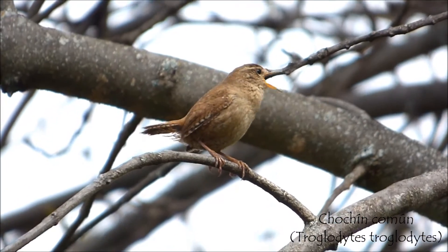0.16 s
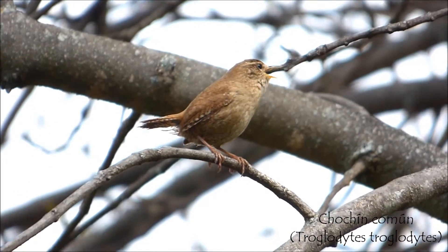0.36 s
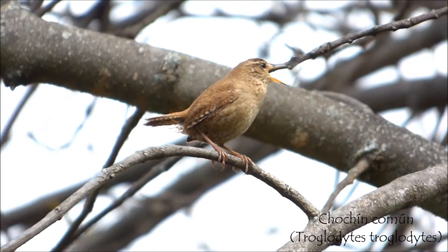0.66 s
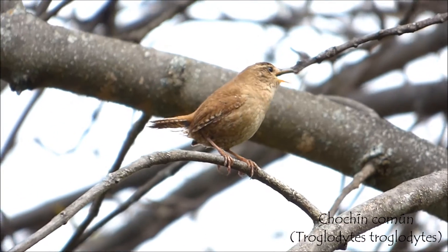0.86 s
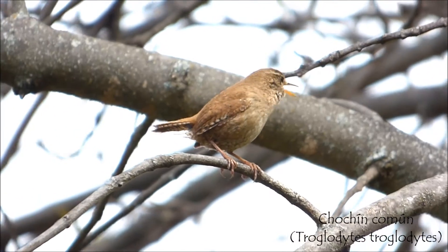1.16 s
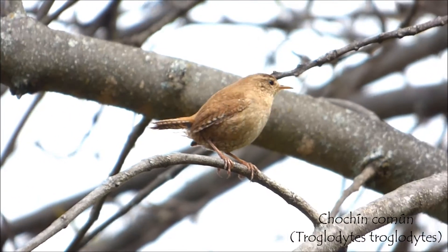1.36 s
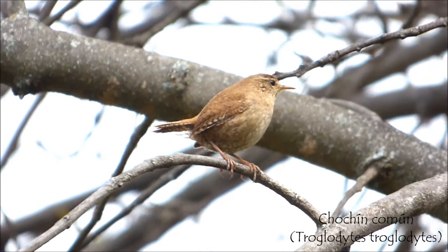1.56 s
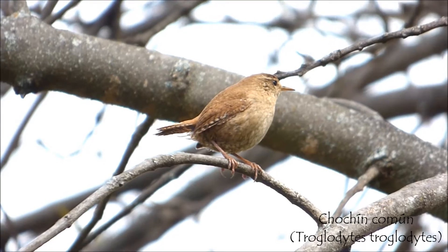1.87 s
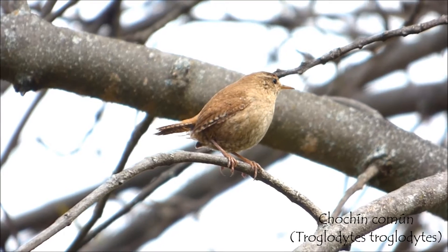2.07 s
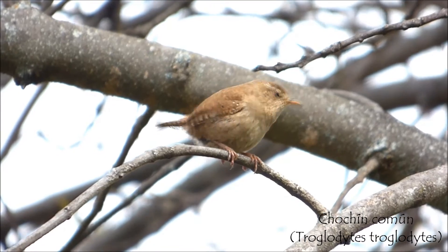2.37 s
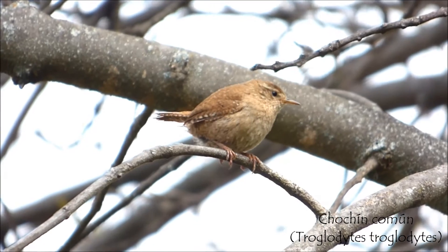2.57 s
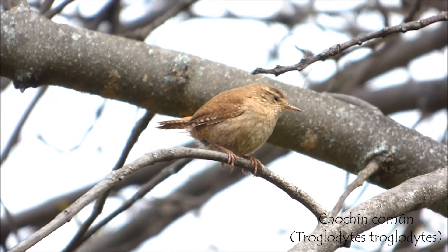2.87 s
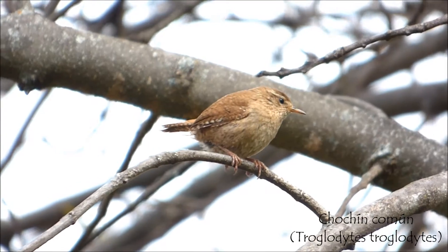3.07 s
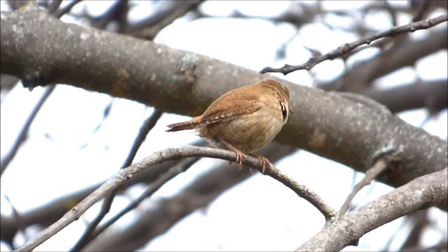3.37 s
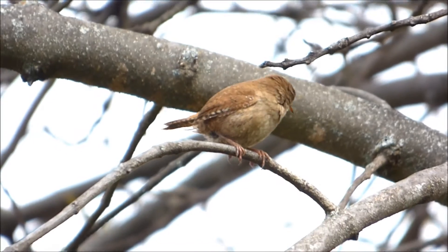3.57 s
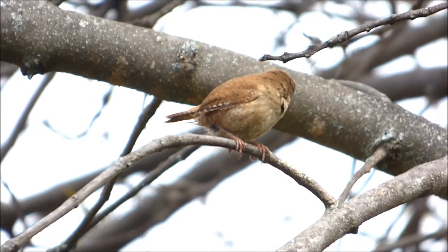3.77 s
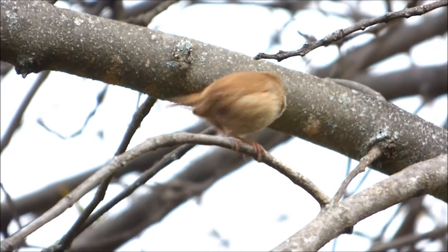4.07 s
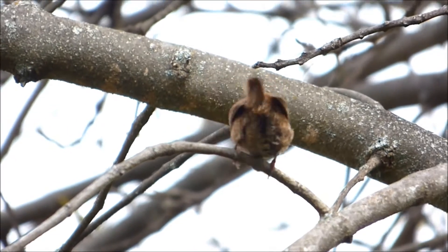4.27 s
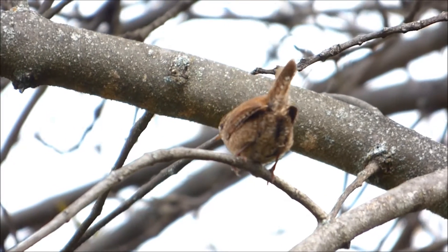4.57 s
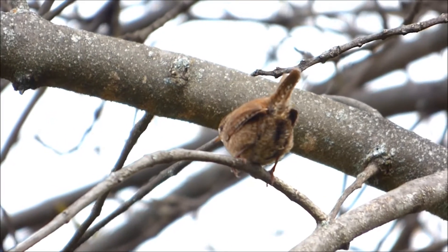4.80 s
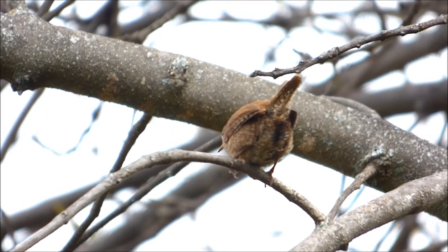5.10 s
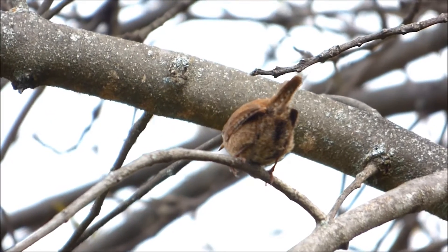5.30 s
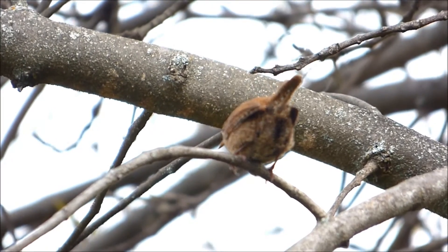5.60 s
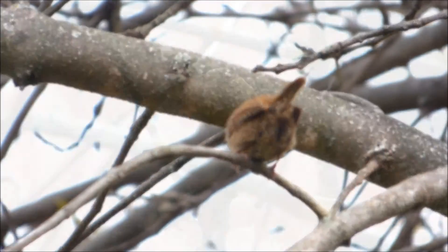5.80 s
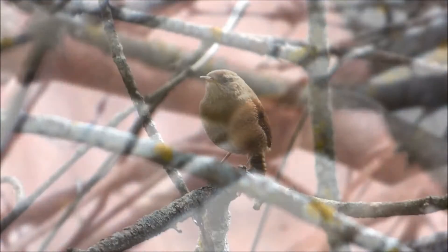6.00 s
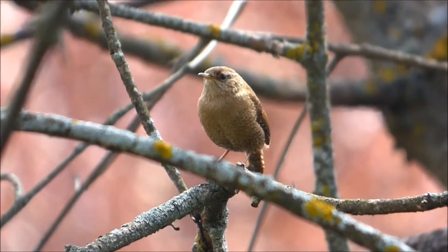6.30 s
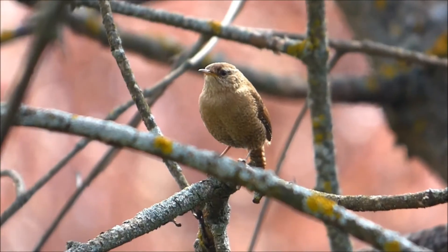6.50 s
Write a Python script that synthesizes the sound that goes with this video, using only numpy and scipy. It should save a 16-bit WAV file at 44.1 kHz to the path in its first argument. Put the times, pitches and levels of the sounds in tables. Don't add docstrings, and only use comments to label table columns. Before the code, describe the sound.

Loud, high trill and eight sharp falling whistles from a nearby wren, then a fainter chorus of warbling, twittering birds in a quiet wood.

```python
import sys
import numpy as np
from scipy import signal
from scipy.io import wavfile
from scipy.ndimage import uniform_filter1d

SR = 44100
rng = np.random.default_rng(int(sys.argv[2]) if len(sys.argv) > 2 else 0)


def bounce(signal):
    frames = np.transpose(np.atleast_2d(signal))
    limited = np.clip(frames, -1, 1)
    pcm = np.round(limited * 32767).astype(np.int16)
    wavfile.write(sys.argv[1], SR, pcm)


def level_to_linear(level):
    exponent = np.asarray(level, float) / 20
    return 10 ** exponent


N = 293265
STROKE_S = .0055

# t/s from its start, f/Hz, level/dB
HOOK = [(0, 5830, -37), (.007, 7050, -41), (.044, 6790, -35.5), (.074, 6200, -36.5), (.101, 5180, -37)]
VEE = [(0, 6380, -48), (.015, 5280, -36), (.04, 4420, -39.5), (.053, 4880, -44), (.062, 7130, -45.5),
       (.085, 6400, -46)]
RISE = [(0, 4000, -39), (.005, 4480, -35), (.014, 4900, -33), (.028, 5660, -40.5)]
DROOP = [(-.007, 5340, -62), (0, 7540, -40.5), (.008, 7690, -39.5), (.02, 7310, -56), (.03, 7400, -35.5),
         (.055, 6920, -37), (.077, 6100, -31.5)]


def evened(x):
    return x / np.sqrt(np.mean(x ** 2) + 1e-20)


def read(points, hz):
    f, value = np.transpose(points)
    return np.interp(np.log(hz + 1), np.log(f + 1), value)


def drift(size, span):
    return evened(np.convolve(rng.standard_normal(size + span - 1), np.hanning(span), "valid"))


def add(mix, s, sound, pan_db):
    left = 1 / (1 + level_to_linear(-2 * pan_db))
    part = mix[:, max(round(s * SR), 0):][:, :len(sound)]
    part += np.sqrt([[2 * left], [2 - 2 * left]]) * sound[:part.shape[1]]


def resonate(x, hz, width):
    return signal.lfilter(*signal.iirpeak(hz, hz / width, SR), x)


def syrinx(hz, overtone_db):
    breath = evened(1.1 + drift(len(hz), span=50))
    wavering_hz = hz * (1 + .004 * drift(len(hz), span=110))
    phase = 2 * np.pi * (np.cumsum(wavering_hz) / SR + rng.random())
    return np.sin(phase) + level_to_linear(overtone_db) * breath * np.sin(2 * phase)


def whistle(rows, overtone_db=-38, purity=0.23):
    s, hz, db = np.transpose(rows)
    t = np.arange(s[0], s[-1], 1 / SR)
    hz = uniform_filter1d(np.interp(t, s, hz), 130, mode="nearest")
    db = np.interp(t, s, db)
    ends = np.clip(np.minimum(t - s[0], s[-1] - t) / .003, 0, 1)
    far = np.clip((-44 - db.max()) / 10, 0, 1)
    flutter_db = (1.1 + 3.5 * far) * drift(len(t), span=350)
    hz = hz * (1 + .016 * far * drift(len(t), span=300))
    voice = syrinx(hz, overtone_db - purity * (db - db.mean()))
    return level_to_linear(db + flutter_db) * voice * np.sin(np.pi / 2 * ends)


def chip(mix, s, length, start_hz, end_hz, db, pan_db, overtone_db=-22):
    u = np.linspace(-.65, .65, round(1.3 * length * SR))
    hz = (start_hz + end_hz) / 2 + u * (end_hz - start_hz)
    swell = np.hanning(len(u)) * level_to_linear(db + 2.5 + 1.5 * u)
    add(mix, s - len(u) / SR / 2, swell * syrinx(hz, overtone_db), pan_db)


def glide(start, length, start_hz, end_hz, db, shape):
    glide_shapes = {"even": (1.01, 1, 0.87), "early": (0.36, 4.4, 8.6), "late": (3.2, 5.7, 0.98)}
    power, swell_db, dip_db = glide_shapes[shape]
    u = np.linspace(0, 1, num=12)
    hz = start_hz + (end_hz - start_hz) * u ** power
    level_db = db + swell_db * (u - .5) - dip_db * (2 * u - 1) ** 2
    return np.transpose([start + u * length, hz, level_db])


def hum():
    # f/Hz, density level/dB
    wash_curve = [(25, -19), (110, -22), (200, -10), (560, -16.5), (750, -5), (1200, -12.5), (2500, -25),
                  (4500, -22.5), (7000, -28), (10000, -31), (13500, -41), (15200, -38)]
    # f/Hz, width/Hz, level/dB
    drone_peaks = [(421.5, 95, -58), (642, 60, -59), (890, 28, -58), (1032, 245, -57.5), (1399, 11.3, -63)]
    # f/Hz, phase/rad
    port_lead = [(470, -.3), (620, -2.9), (1400, -3.1), (2000, -6.1), (8000, -6.3)]
    # f/Hz, likeness 0-1
    port_likeness = [(60, .8), (400, .9), (1000, .62), (14000, .2)]
    # f/Hz, left minus right level/dB
    port_balance = [(180, -1.5), (380, 4), (700, 0), (8000, -3), (14000, 0)]
    frames, hz = N // 256 + 5, np.fft.rfftfreq(1024, 1 / SR)
    a, b, c, d, patches = rng.standard_normal((frames, 513, 5)).T
    patches = evened(uniform_filter1d(uniform_filter1d(patches, 8, 0), 12, 1))
    wash = level_to_linear(read(wash_curve, hz))
    power = (level_to_linear(-53) * wash) ** 2 / np.sum(wash ** 2)
    for f, width, db in drone_peaks:
        bell = np.exp(-(2 * (hz - f) / width) ** 2)
        power = power + level_to_linear(2 * db) * bell / bell.sum()
    same = np.clip(read(port_likeness, hz), 0, 1)[:, None]
    left = a + 1j * b
    right = same * left + np.sqrt(1 - same ** 2) * (c + 1j * d)
    right = right * np.exp(-1j * read(port_lead, hz))[:, None]
    lean = level_to_linear(read(port_balance, hz) / 2)[:, None]
    z = np.array([left * lean, right / lean]) * np.sqrt(power)[:, None] * level_to_linear(1.61 * patches)
    noise = signal.istft(z, nperseg=1024, noverlap=768)[1][:, :N]
    return np.sqrt(power.sum()) * evened(noise)


def wood(x, wet_db, near=0.42):
    # t/s, level/dB
    trunk_echoes = [(.0021, -17.5), (.0045, -13.5), (.0075, -19.5), (.033, -35.5), (.035, -13),
                    (.039, -21.5), (.052, -27)]
    # f/Hz, t60/s
    decay_times = [(2500, 0.87), (8000, 0.47), (14000, 0.36)]
    taps = np.zeros((2, 30000))
    at = np.arange(100, 30000, 20) + rng.integers(0, 20, (2, 1495))
    np.put_along_axis(taps, at, rng.choice([-1., 1.], at.shape), 1)
    taps *= level_to_linear(2.1 * drift(taps.shape[1], span=900))
    s = np.arange(taps.shape[1]) / SR
    taps *= 1 + near * np.exp(-(s / 0.038) ** 2)
    taps[1] = 0.63 * taps[0] + 0.76 * taps[1]
    hz, t, z = signal.stft(taps, SR, nperseg=256)
    decay = level_to_linear(-60 * t / read(decay_times, hz)[:, None])
    tail = signal.istft(z * decay, SR, nperseg=256)[1]
    tail *= level_to_linear(wet_db) / np.linalg.norm(tail, axis=1)[:, None]
    for delay, db in trunk_echoes:
        tail[:, round(delay * SR)] += level_to_linear(db) * min(near + 0.22, 1)
    spread = 0.6 * x + 0.43 * x[::-1]
    return x + signal.oaconvolve(spread, tail, axes=1)[:, :N]


def ports(x):
    high_pass = signal.butter(4, 10500, "high", fs=SR, output="sos")
    treble = signal.sosfiltfilt(high_pass, x[1])
    return x - [[.35], [0]] * treble


def distant_reel():
    u = np.linspace(0, 1, round(.46 * SR))
    hiss = resonate(resonate(rng.standard_normal(len(u)), 6550, 500), 6600, 700)
    mix = np.zeros((2, N))
    add(mix, 1.8, level_to_linear(-70.5 + 5.3 * u) * evened(hiss) * signal.windows.tukey(len(u), .2), -4)
    return mix


def far_bird():
    # t/s from its start, f/Hz, level/dB
    falling_note = [(0, 7380, -69), (.025, 6640, -51), (.04, 5600, -53), (.057, 4280, -55)]
    fall_times = [
        5.98,
        6.098,
        6.235,
        6.375,
        6.52,
    ]
    mix = np.zeros((2, N))
    for at in fall_times:
        add(mix, at, whistle(falling_note), 15)
    return mix


def chatter():
    # t/s, length/s, level/dB
    rasps = [
        (3.064, 0.05, -48),
        (3.169, 0.035, -45.5),
        (3.255, 0.055, -46.5),
        (3.355, 0.062, -47),
        (3.484, 0.048, -46.5),
        (3.604, 0.052, -46.5),
        (3.74, 0.066, -48.5),
        (3.885, 0.034, -46),
        (3.994, 0.07, -49),
        (4.107, 0.017, -60),
    ]
    # f/Hz, width/Hz, level/dB
    throat = [(2450, 750, 10), (3000, 700, 7), (1750, 700, 1.5), (9500, 4100, -12)]
    mix = np.zeros((2, N))
    for at, length, db in rasps:
        n = round(length * SR)
        turns = np.cumsum(330 * (1 + 0.42 * drift(n, span=150))) / SR
        drive = (0.18 + np.exp(-(turns % 1) / 0.25)) * rng.standard_normal(n)
        gape = rng.normal(1, .06)
        rasp = np.zeros(n)
        for f, width, gain_db in throat:
            rasp += level_to_linear(gain_db) * resonate(resonate(drive, gape * f, width), gape * f, width)
        add(mix, at, level_to_linear(db) * evened(rasp) * signal.windows.tukey(n, .6), -12)
    return mix


def gabble():
    mix = np.zeros((2, N))
    for when, high, span, loud in rng.random((160, 4)):
        hz = 5600 + 3200 * high
        half_hz = 2400 * (span - .5)
        chip(mix, 2.85 + when, STROKE_S, hz - half_hz, hz + half_hz, -52 + 8 * loud, -44.0, overtone_db=-20.0)
    return mix


def buzzes(mix):
    buzz_rows = [
        (4.95, 4.985, 3500, 3570, 140, -59),
        (5.11, 5.209, 3490, 4040, 130, -53),
        (5.28, 5.375, 3510, 3820, 120, -54.5),
    ]
    for start, end, start_hz, end_hz, rate, db in buzz_rows:
        length = end - start
        u = np.linspace(0, 1, round(length * SR))
        throb = np.maximum(np.cos(2 * np.pi * rate * (1 - u) * length - 3.6), 0) ** 1.2
        voice = syrinx(start_hz + u * (end_hz - start_hz), -40)
        add(mix, start, level_to_linear(db + 6.6 + 4.4 * u) * throb * voice, 5)


def far_trills(mix):
    trill_rows = [
        (4.4195, 4.74, 38.2, -49, 7),
    ]
    for first, last, rate, db, pan_db in trill_rows:
        for at in np.arange(first, last, 1 / rate):
            chip(mix, at, STROKE_S, 6900, 4480, db, pan_db)


def twitter(mix):
    # centre t/s, f/Hz at start and end, level/dB
    quick_strokes = [(2.5855, 6900, 9600, -48), (3.079, 5170, 7350, -37), (3.083, 5170, 7500, -36),
                     (3.089, 5660, 7760, -32), (3.312, 8100, 5000, -42), (3.163, 4900, 7340, -36),
                     (3.238, 6550, 8900, -33), (3.327, 4730, 7560, -42), (3.332, 5340, 7900, -39),
                     (3.337, 5050, 7400, -40), (3.513, 8300, 5750, -28.5), (3.534, 7050, 6450, -35),
                     (3.543, 7140, 9060, -39), (3.55, 7570, 7160, -29), (3.56, 7800, 8240, -46),
                     (3.565, 4970, 6140, -34), (3.569, 7730, 7200, -29), (3.632, 6500, 8860, -29),
                     (3.646, 6270, 8000, -28.5), (3.654, 9600, 6850, -29), (3.663, 8760, 9300, -38),
                     (3.688, 8240, 4120, -42), (3.706, 8830, 4770, -34), (3.752, 6150, 7700, -32),
                     (3.766, 5400, 9100, -42), (3.911, 8230, 7240, -39), (3.919, 8040, 7000, -37),
                     (3.927, 7100, 7900, -35)]
    # centre t/s, f/Hz at start and end, level/dB
    slow_strokes = [(2.579, 6200, 6800, -51), (2.609, 7300, 9000, -56), (2.61, 6750, 7650, -46),
                    (3.071, 5440, 7450, -41), (3.095, 8450, 5760, -32), (3.109, 8440, 4900, -29.5),
                    (3.203, 6000, 7500, -44), (3.212, 7500, 9300, -40), (3.472, 4770, 5200, -42),
                    (3.493, 5700, 4860, -42), (3.728, 4860, 5640, -38), (3.751, 4850, 6100, -39)]
    # delay t/s, length/s, f/Hz at start and end, relative level/dB
    stroke_figures = [
        [(-.004, .005, 7000, 4830, -5.5), (0, 0.007, 7600, 4700, 0), (.015, 0.006, 7200, 9500, -10),
         (.02, 0.0075, 7240, 7660, -5)],
        [(-.004, 0.0071, 7700, 6100, -1), (.003, 0.012, 6400, 5100, 3.5), (-0.0064, 0.0056, 9000, 6600, -1)],
    ]
    # t/s of first and last, gap/s, first and last level/dB
    figure_repeats = [
        (2.6295, 2.842, .035, -40, -34),
        (2.899, 3.013, .0164, -45.5, -39.5),
    ]
    for length, strokes in [(.0034, quick_strokes), (.0099, slow_strokes)]:
        for at, *stroke in strokes:
            chip(mix, at, length, *stroke, -26.0)
    for figure, (first, last, gap, first_db, last_db) in zip(stroke_figures, figure_repeats):
        for at in np.arange(first, last, gap):
            db = np.interp(at, [first, last], [first_db, last_db]) + rng.normal(0, 1.5)
            for delay, *sweep, relative_db in figure:
                stroke_s = at + delay + rng.normal(0, 0.00073)
                chip(mix, stroke_s, *sweep, db + relative_db + rng.normal(0, 2.5), -24.0)


def whistlers():
    # t/s, f/Hz, level/dB
    wren_notes = [
        [(0.305, 6900, -30), (0.311, 7900, -32), (0.32, 8000, -24.5), (0.335, 7650, -23), (0.343, 7210, -24.5),
         (0.356, 7240, -27)],
        [(0.397, 3740, -47), (0.415, 3975, -38), (0.431, 4180, -27.5), (0.436, 5020, -39), (0.441, 4400, -38)],
    ]
    right_warbles = { (-6.5, -36): [[(1.39, 3330, -58), (1.42, 3380, -55), (1.45, 3510, -47),
                     (1.51, 3510, -57.5), (1.56, 3470, -66)], [(1.972, 6250, -55), (1.99, 5620, -51),
                     (2.025, 5690, -41), (2.03, 5650, -46), (2.038, 4700, -55)], [(2.613, 4100, -42.5),
                     (2.645, 4137, -33.5), (2.658, 4260, -57), (2.685, 4260, -43.5), (2.715, 4380, -55)],
                     [(2.197, 4200, -55), (2.208, 5170, -41), (2.222, 4300, -43), (2.255, 3890, -42.5),
                     (2.3, 3790, -44.5), (2.32, 3560, -40.5), (2.345, 2940, -49), (2.375, 2570, -56.5),
                     (2.44, 2560, -64)], [(2.44, 2650, -58), (2.46, 2900, -53), (2.485, 3060, -41),
                     (2.51, 3100, -48), (2.53, 3560, -41.5), (2.556, 3640, -42)], [(2.86, 1843, -66),
                     (2.9, 2000, -62), (2.92, 2210, -54), (2.945, 2380, -51), (2.985, 2415, -48.5)]],
                     (-21, -19): [[(3.35, 5460, -50), (3.375, 5650, -37), (3.39, 6520, -32),
                     (3.41, 7200, -29), (3.45, 7240, -38)], [(3.36, 6600, -51), (3.378, 6700, -38),
                     (3.395, 6970, -36), (3.413, 7420, -33)]]}
    left_warbles = { (7, -44): [[(5.457, 8200, -49), (5.468, 7530, -46), (5.482, 7650, -42),
                    (5.497, 7970, -37), (5.52, 7790, -36), (5.546, 7807, -45), (5.6, 7700, -43)],
                    [(3.576, 6210, -46), (3.6, 6350, -35.5), (3.63, 6200, -38.5), (3.648, 5950, -36.5),
                    (3.675, 4950, -36.5)], [(4.78, 6600, -44), (4.795, 7400, -45), (4.82, 8090, -39),
                    (4.86, 7370, -38), (4.9, 5270, -35)]], (6.4, -21): [[(4.765, 6200, -51),
                    (4.78, 5650, -47), (4.79, 5850, -41), (4.803, 5600, -42), (4.812, 5930, -44),
                    (4.835, 6240, -43)], [(5.808, 6350, -40.5), (5.835, 5550, -34.5), (5.86, 5730, -38),
                    (5.885, 5040, -36), (5.945, 4560, -37.5)]], (3.5, -36): [[(4.94, 4420, -57),
                    (4.962, 4380, -47), (4.973, 3970, -38)], [(4.979, 4770, -43), (4.99, 4070, -35),
                    (5.0, 3560, -41.5), (5.012, 3480, -39), (5.021, 2400, -55)], [(5.32, 2760, -69),
                    (5.34, 3050, -41), (5.357, 2933, -47), (5.366, 2984, -39), (5.375, 2964, -50),
                    (5.393, 3020, -42), (5.405, 3176, -40), (5.446, 3145, -44.5)], [(5.488, 3700, -51),
                    (5.496, 4070, -38), (5.52, 3740, -38), (5.537, 3410, -42)], [(5.58, 3230, -46),
                    (5.605, 3350, -46), (5.625, 3810, -34.5), (5.65, 4040, -34.5), (5.662, 3700, -42),
                    (5.68, 3060, -49), (5.7, 3040, -45)], [(6.025, 2450, -51), (6.035, 4280, -44),
                    (6.05, 3884, -38), (6.066, 4150, -33), (6.078, 3900, -32.5), (6.084, 4080, -32),
                    (6.092, 3900, -38), (6.105, 4120, -32.5), (6.135, 4184, -38.5)], [(6.185, 4025, -46),
                    (6.2, 4090, -33), (6.22, 3340, -42), (6.27, 2900, -41)]]}
    left_bird = {"even": [(5.638, 0.022, 5570, 4160, -33.5), (5.712, 0.042, 5250, 5060, -33.5),
                 (5.862, .014, 4230, 3260, -54), (5.876, 0.022, 3220, 3150, -58),
                 (6.012, 0.012, 2700, 3560, -53)]}
    middle_bird = {"even": [(1.405, 0.033, 4510, 4690, -39.5), (4.015, 0.018, 3900, 4580, -46),
                   (4.712, 0.023, 3800, 4170, -46.5), (4.733, 0.0067, 4200, 4940, -43),
                   (5.021, 0.0079, 2890, 3120, -42.5), (5.08, 0.027, 2410, 2760, -59),
                   (6.35, 0.03, 3080, 2520, -47), (6.315, 0.061, 2890, 3680, -55)],
                   "early": [(4.228, 0.048, 3660, 3700, -43)], "late": [(3.27, .073, 5300, 4660, -45),
                   (4.605, 0.03, 4660, 5500, -42.5)]}
    right_bird = {"even": [(1.19, 0.066, 3300, 2540, -57), (1.575, 0.011, 6100, 6500, -56),
                  (1.588, .009, 6400, 4250, -54.5), (1.599, .01, 5700, 4250, -45),
                  (1.608, 0.011, 5000, 4720, -44), (1.621, 0.023, 4900, 5350, -42),
                  (1.79, 0.011, 3630, 7150, -55), (1.802, .007, 7100, 4100, -50),
                  (1.838, 0.041, 3240, 2980, -52), (1.884, .03, 2750, 3100, -55.5),
                  (1.976, .025, 4580, 3880, -59), (3.031, 0.045, 3690, 2820, -44),
                  (3.481, 0.067, 3485, 3468, -40.5), (3.655, 0.046, 3035, 2985, -40.5)],
                  "early": [(1.808, 0.031, 4240, 3300, -67), (3.401, 0.066, 4610, 3870, -35.5)],
                  "late": [(3.771, .05, 3790, 2940, -45)]}
    far_right_bird = {"even": [(3.17, 0.017, 4500, 5340, -42.5), (3.245, 0.014, 5330, 5570, -32.5),
                      (3.337, 0.012, 7980, 7600, -33.5), (3.88, 0.011, 5840, 6150, -41)],
                      "early": [(3.215, 0.022, 7350, 7400, -29.5)],
                      "late": [(3.022, 0.028, 7700, 7260, -34.5), (3.882, 0.013, 8850, 8650, -51),
                      (3.895, .016, 8250, 7800, -50)]}
    # t/s, pitch factor, effort level/dB
    song = [
        (HOOK, [(3.716, 0.96, -0.2), (3.857, 0.97, -0.3)]),
        (VEE, [(4.085, 1.01, 4), (4.325, 0.99, 3.5)]),
        (RISE, [(5.037, 1.04, 1), (5.214, 0.98, 1.3), (5.381, 0.99, 1)]),
        (DROOP, [(5.798, 0.98, -2), (5.916, 0.99, -1), (6.04, 1, -0.5), (6.163, 1.03, -2.5), (6.289, 1.02, -1.5)]),
    ]
    # t/s, length/s, f/Hz at both ends, f/Hz in the middle, level/dB
    arches = [
        (3.167, 0.1, 2440, 2970, -46.5),
        (3.822, 0.12, 2840, 2593, -49),
    ]
    left_db, right_db = 7, -6.5
    birds = [(left_bird, left_db), (middle_bird, 4.5), (right_bird, right_db), (far_right_bird, -24)]

    notes = [(rows, 1.5) for rows in wren_notes]
    for bird, pan_db in birds:
        for shape in bird:
            notes += [(glide(*row, shape), pan_db) for row in bird[shape]]
    for shape, repeats in song:
        for at, factor, db in repeats:
            notes.append((np.array(shape) * [1, factor, 1] + [at, 0, db], left_db))
    u = np.linspace(0, 1, num=12)
    arch = 1 - (2 * u - 1) ** 2
    for start, length, ends_hz, middle_hz, db in arches:
        hz = ends_hz + (middle_hz - ends_hz) * arch
        level_db = db + 5 * (.5 - arch)
        notes.append((np.transpose([start + u * length, hz, level_db]), right_db))

    mix = np.zeros((2, N))
    for (pan_db, overtone_db), warbles in {**right_warbles, **left_warbles}.items():
        for rows in warbles:
            add(mix, rows[0][0], whistle(rows, overtone_db, purity=-.7), pan_db)
    for rows, pan_db in notes:
        overtone_db = -19 if pan_db < -10 else -36
        add(mix, rows[0][0], whistle(rows, overtone_db), pan_db)
    return mix


def chorus():
    mix = whistlers()
    twitter(mix)
    far_trills(mix)
    buzzes(mix)
    return mix


def wren():
    # centre t/s, level/dB
    trill = [(0.019, -31.5), (0.045, -28.5), (0.0732, -30), (0.0968, -32.5), (0.1236, -30.5), (0.15, -28.5),
             (0.175, -30.5), (0.201, -31), (0.227, -29), (0.254, -31.5), (0.2767, -29)]
    # t/s from its start, f/Hz, level/dB
    swoop = [(-.003, 4140, -33), (.004, 7120, -24.5), (.01, 7543, -26), (0.027, 7204, -23.5),
             (.037, 6900, -16.5), (.047, 6240, -16.5), (.056, 5320, -18.5), (0.071, 4520, -35),
             (0.08, 4480, -40)]
    # t/s, effort level/dB
    swoop_times = [
        (0.478, -1),
        (0.588, 0),
        (0.699, -1),
        (0.81, -0.5),
        (0.9219, -0.5),
        (1.035, 0),
        (1.151, -1.5),
        (1.268, -1),
    ]
    mix = np.zeros((2, N))
    for at, level_db in [(.002, -40)] + trill:
        start_hz, end_hz = 6900 + rng.normal(0, 150), 4650 + rng.normal(0, 150)
        chip(mix, at, STROKE_S, start_hz, end_hz, level_db, -1.4, overtone_db=-28.5)
    s, hz, db = np.transpose(swoop)
    for at, effort_db in swoop_times:
        level_db = db + effort_db + rng.normal(0, .8, len(s))
        rows = np.transpose([s, hz * rng.normal(1, .006), level_db])
        add(mix, at + s[0], whistle(rows, overtone_db=-32.5, purity=1.0), -1.1)
    return mix


def scene():
    second_starts, first_ends = 5.878, 6.378
    t = np.arange(N) / SR
    first = wood(wren(), -6.5, near=1.87) + wood(ports(chorus()), -6.5)
    first += ports(wood(chatter() + gabble(), -0.18))
    first += distant_reel() + hum() - .0031
    second = wood(far_bird(), -0.88) + level_to_linear(-1.0) * hum() - .003
    return first * (t < first_ends) + second * (t >= second_starts)


def masked_treble(x):
    mask_db, spread_db, from_hz, slope_db = -36, 5, 8200, -2.6
    hz, t, z = signal.stft(x, SR, nperseg=2048, noverlap=1024)
    band = np.arange(len(hz)) // 24
    power = np.add.reduceat((abs(z) ** 2).sum(0), np.arange(0, len(hz), 24), axis=0)
    under_db = 10 * np.log10(power / power.max(0) + 1e-20)
    luck_db = spread_db * rng.standard_normal((len(t), len(power))).T
    threshold_db = mask_db + slope_db * (hz - from_hz) / 1000
    dropped = (under_db + luck_db)[band] < threshold_db[:, None]
    dropped = dropped & (hz > from_hz)[:, None]
    return signal.istft(z * ~dropped, SR, nperseg=2048, noverlap=1024)[1][:, :N]


def low_pass(x):
    return signal.sosfilt(signal.butter(12, 15800, fs=SR, output="sos"), x)


def record(dry):
    edge = signal.butter(12, 15300, fs=SR, output="sos")
    offset = dry.mean(axis=1)[:, None]
    limited = signal.sosfiltfilt(edge, dry) - offset
    mix = masked_treble(limited) + offset
    return low_pass(mix)


dry = scene()
out = record(dry)
bounce(out)
```